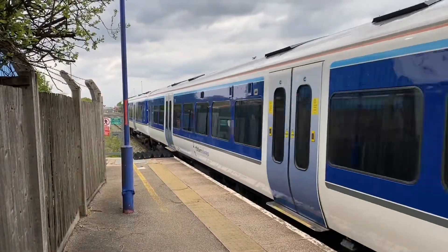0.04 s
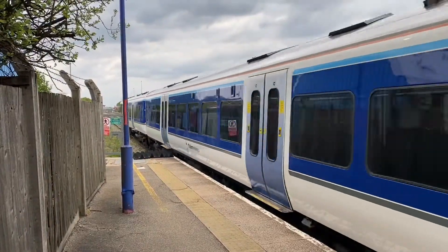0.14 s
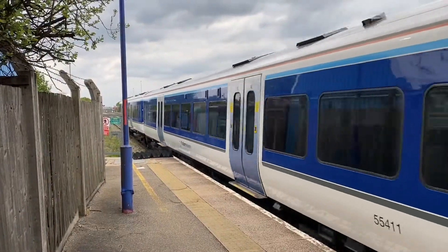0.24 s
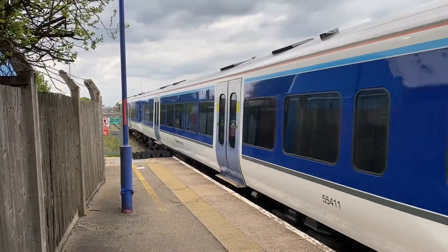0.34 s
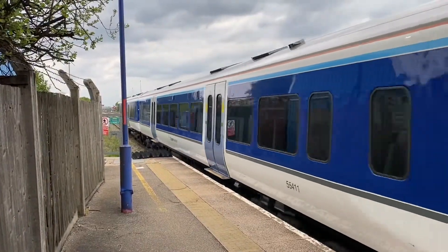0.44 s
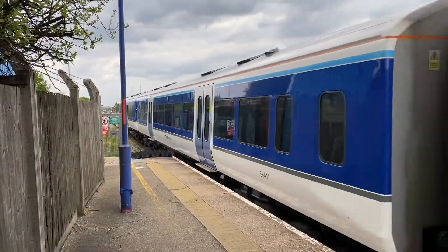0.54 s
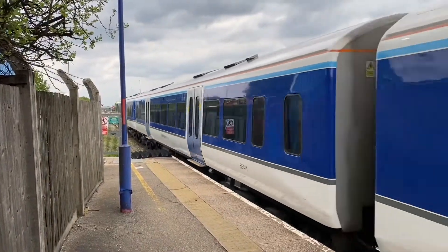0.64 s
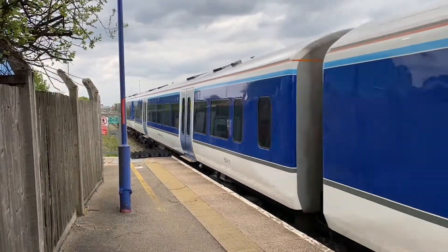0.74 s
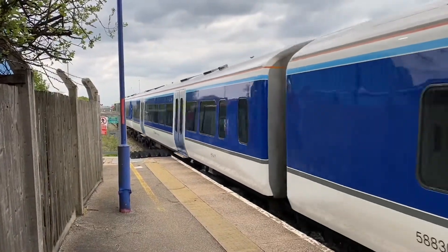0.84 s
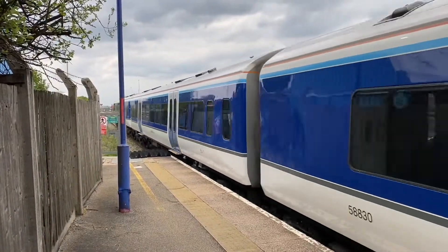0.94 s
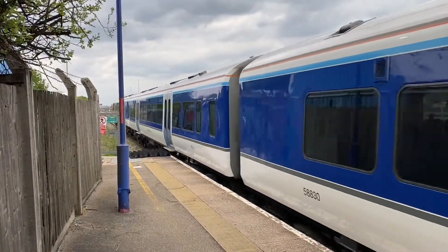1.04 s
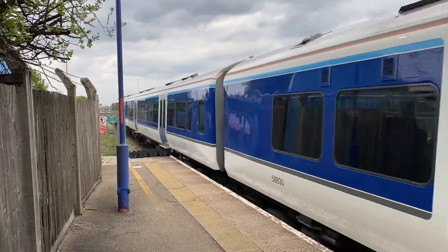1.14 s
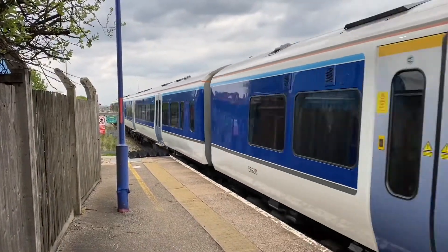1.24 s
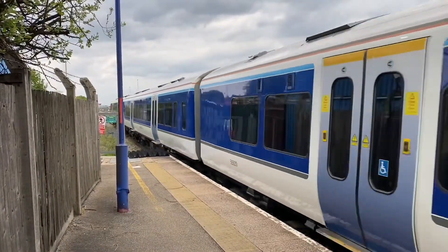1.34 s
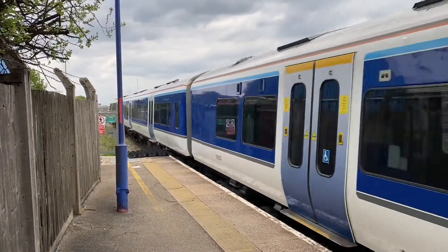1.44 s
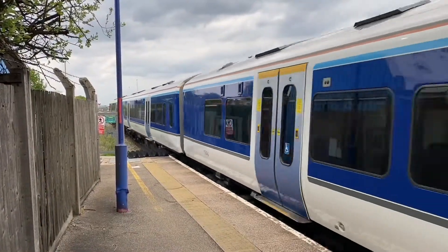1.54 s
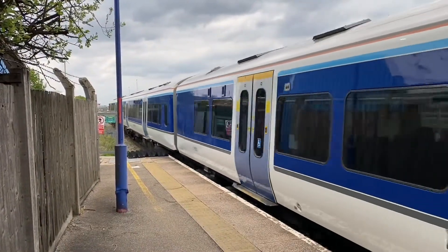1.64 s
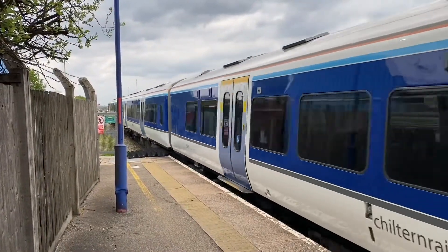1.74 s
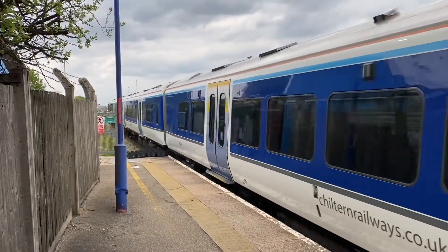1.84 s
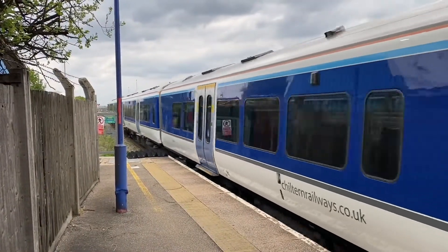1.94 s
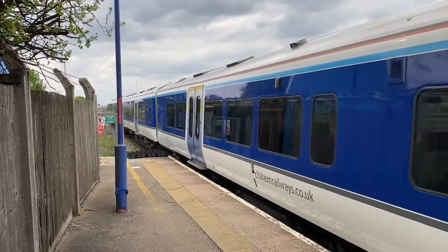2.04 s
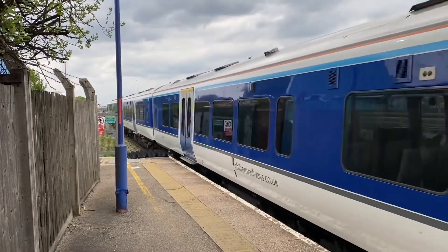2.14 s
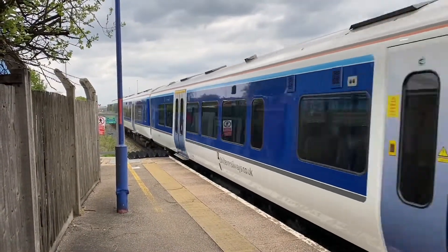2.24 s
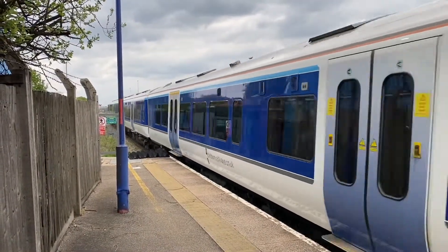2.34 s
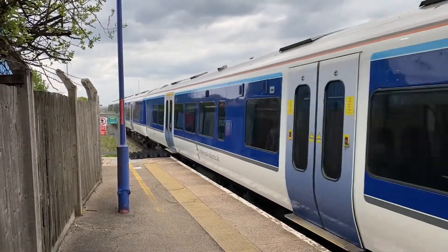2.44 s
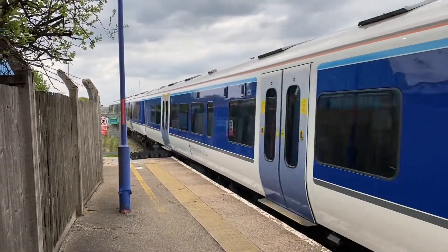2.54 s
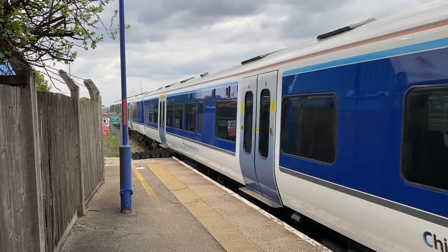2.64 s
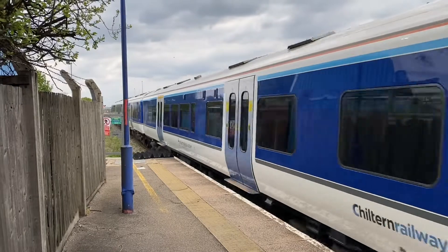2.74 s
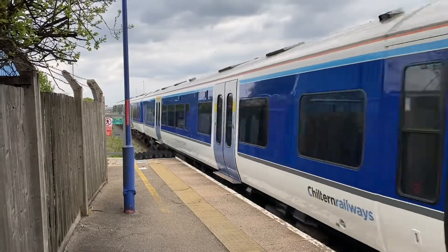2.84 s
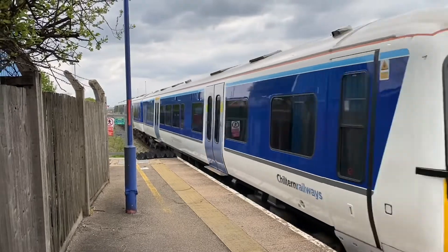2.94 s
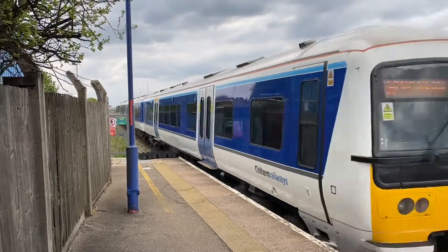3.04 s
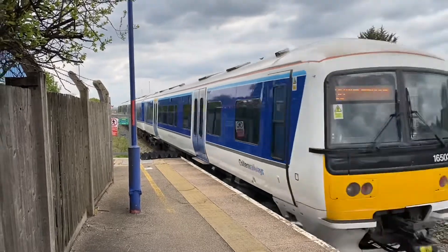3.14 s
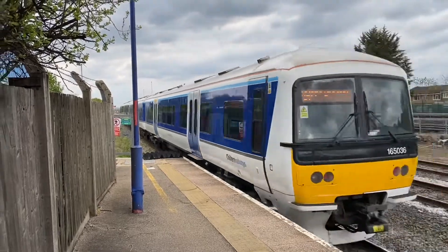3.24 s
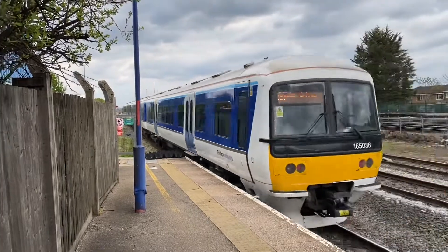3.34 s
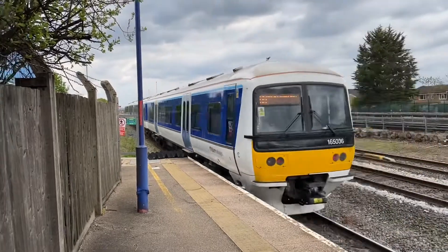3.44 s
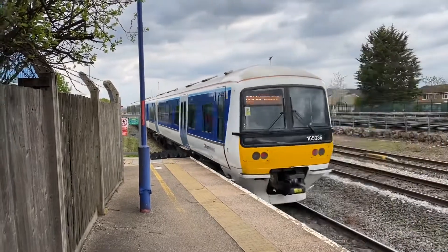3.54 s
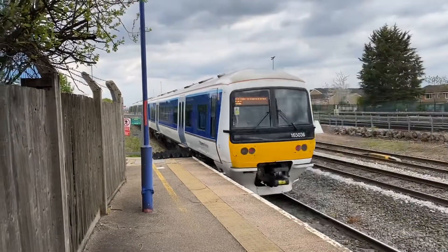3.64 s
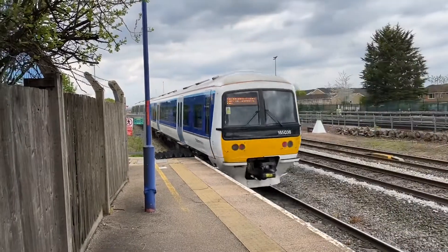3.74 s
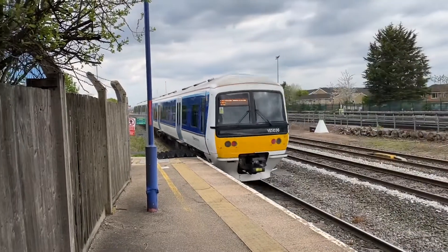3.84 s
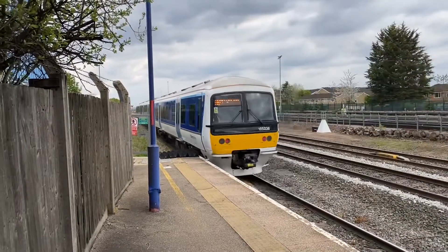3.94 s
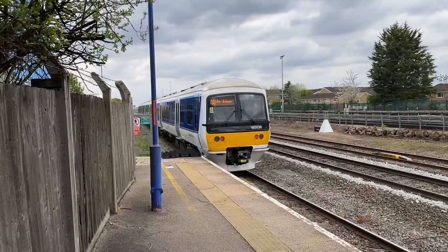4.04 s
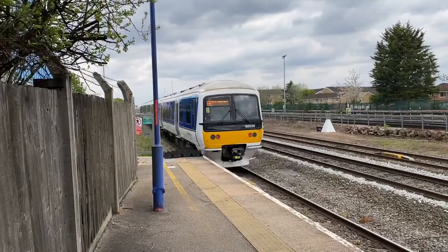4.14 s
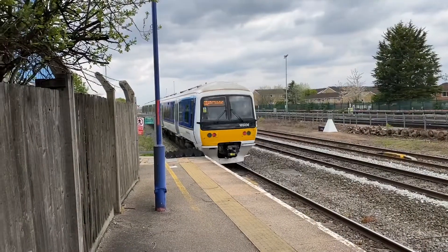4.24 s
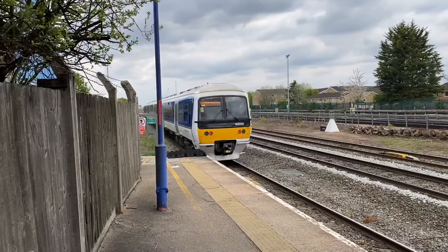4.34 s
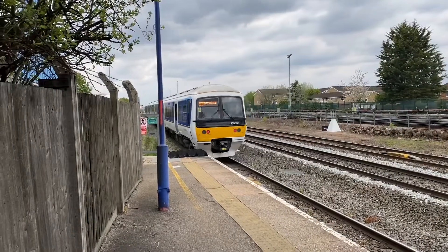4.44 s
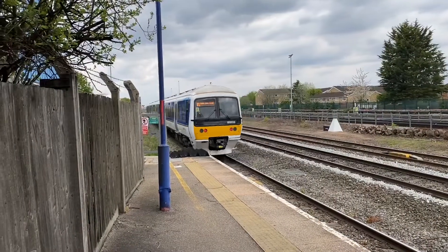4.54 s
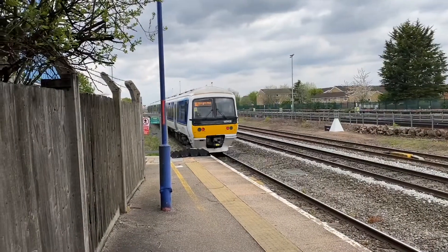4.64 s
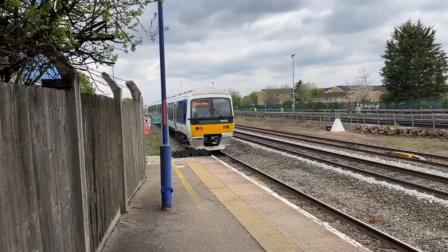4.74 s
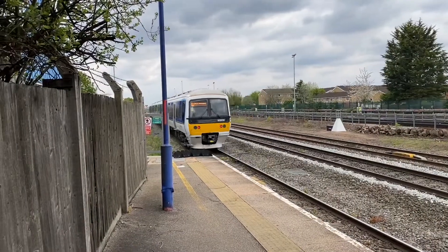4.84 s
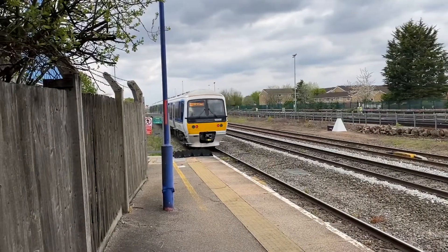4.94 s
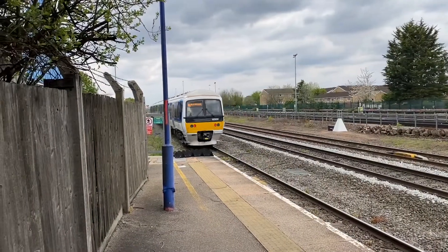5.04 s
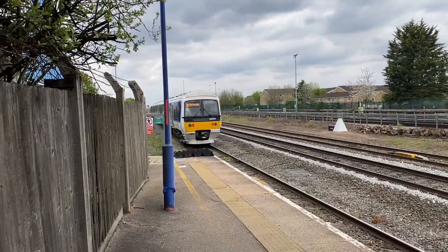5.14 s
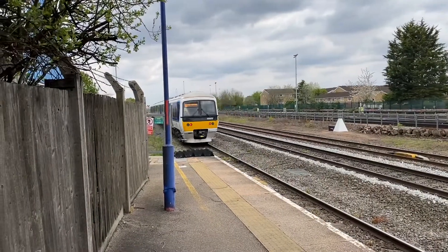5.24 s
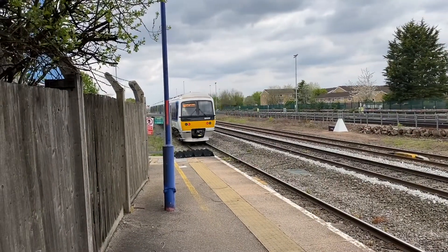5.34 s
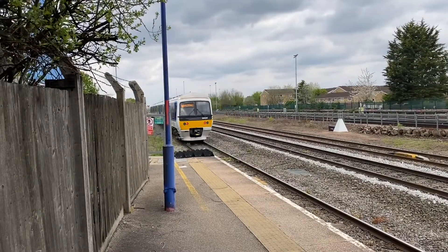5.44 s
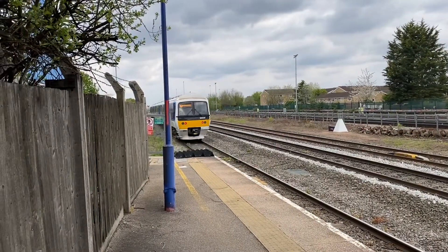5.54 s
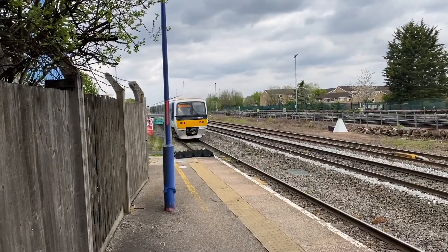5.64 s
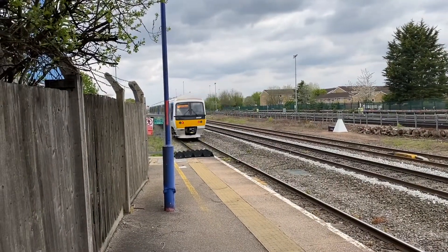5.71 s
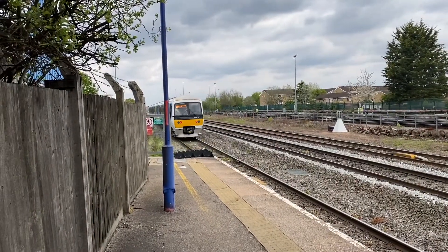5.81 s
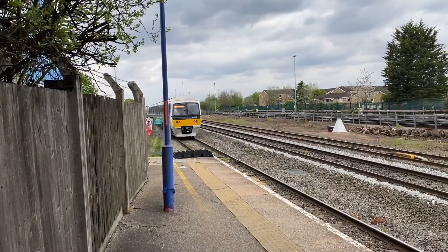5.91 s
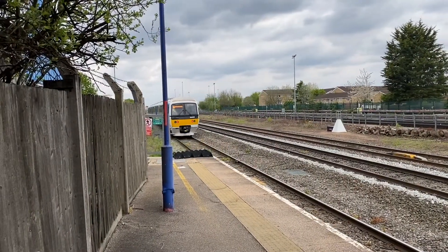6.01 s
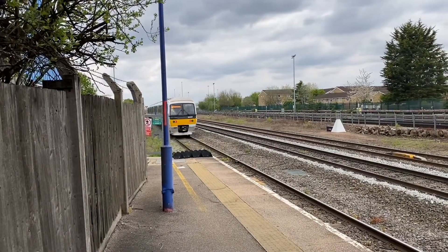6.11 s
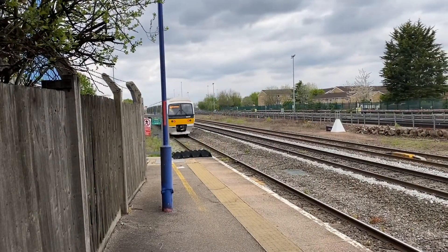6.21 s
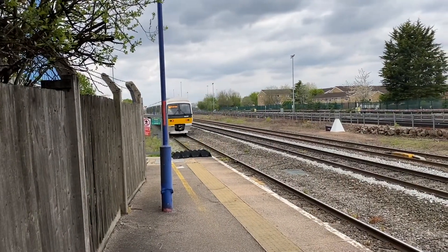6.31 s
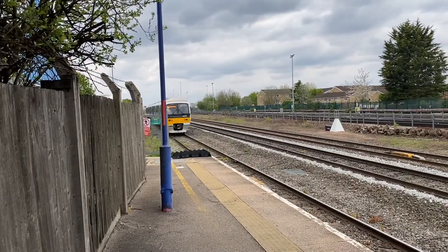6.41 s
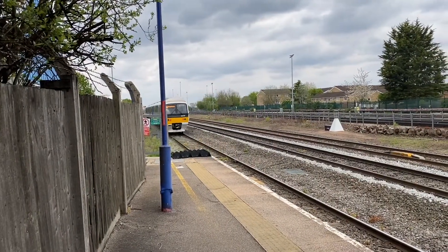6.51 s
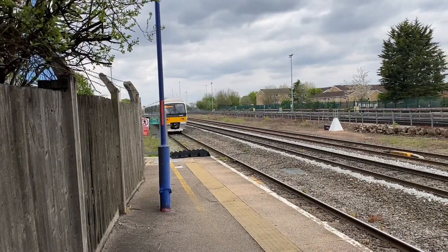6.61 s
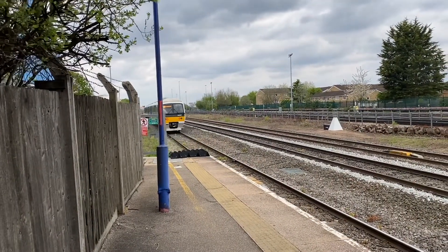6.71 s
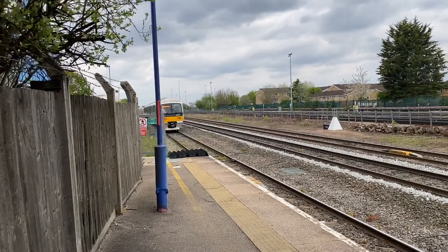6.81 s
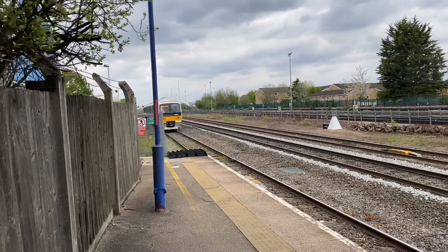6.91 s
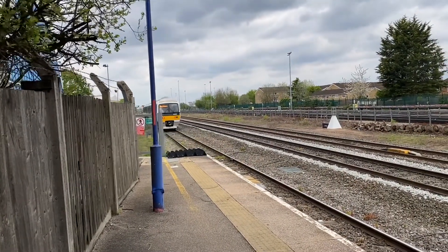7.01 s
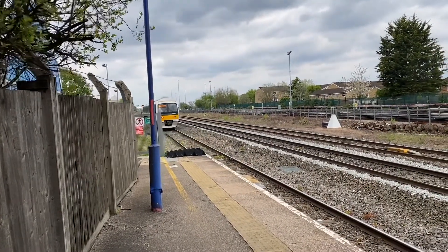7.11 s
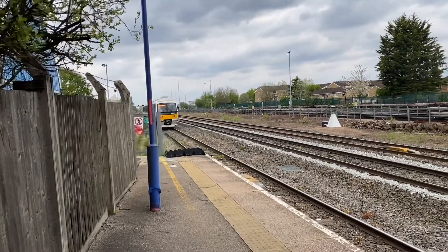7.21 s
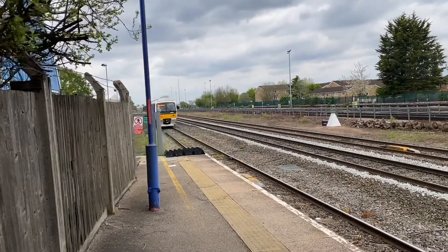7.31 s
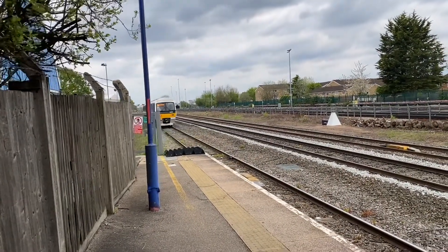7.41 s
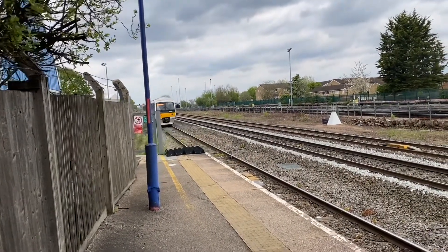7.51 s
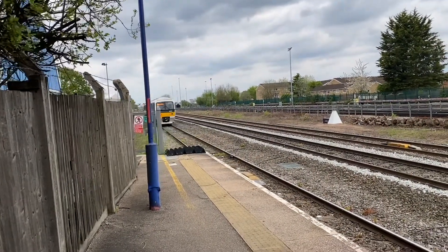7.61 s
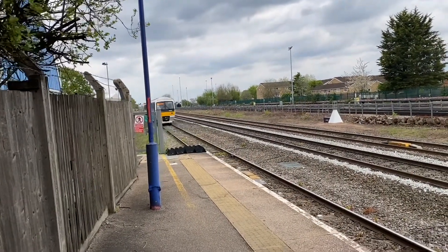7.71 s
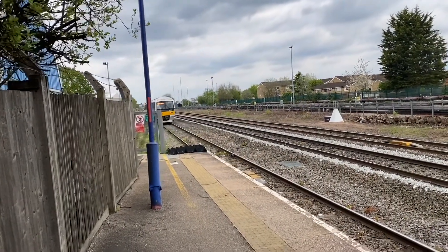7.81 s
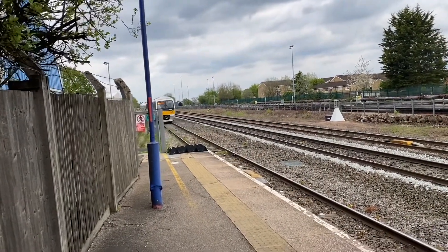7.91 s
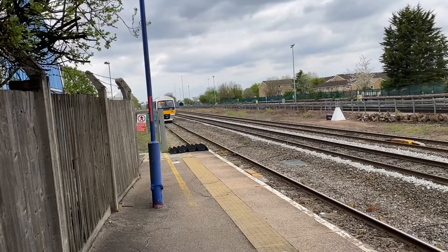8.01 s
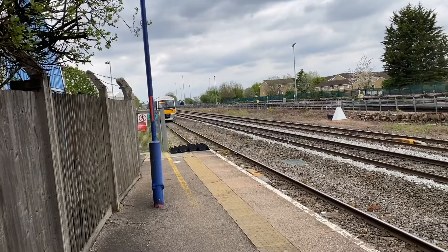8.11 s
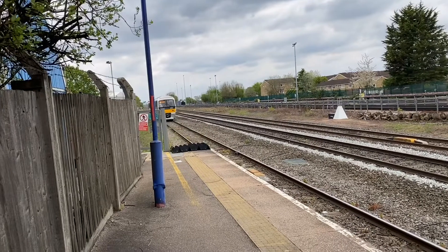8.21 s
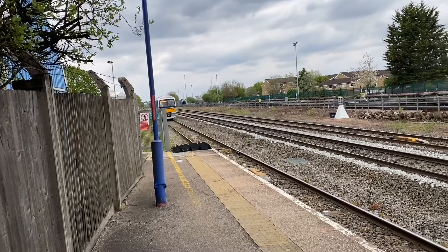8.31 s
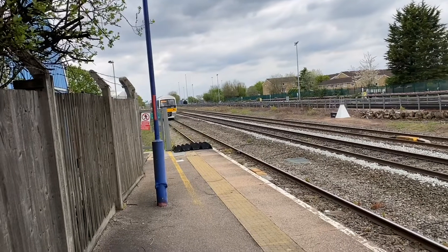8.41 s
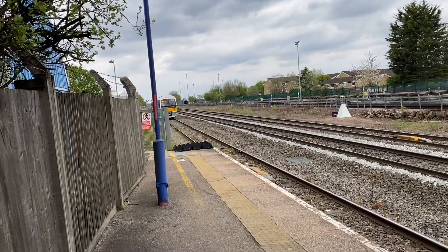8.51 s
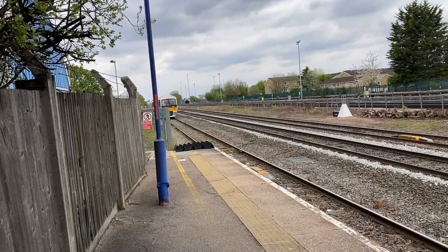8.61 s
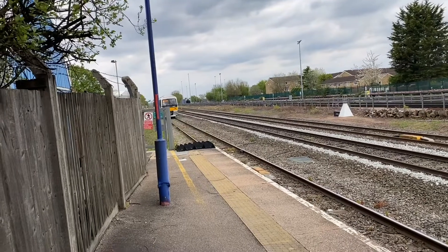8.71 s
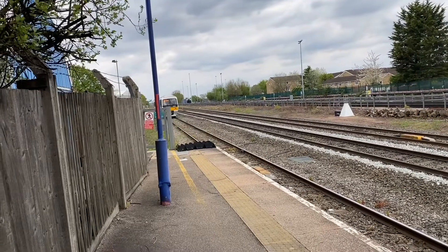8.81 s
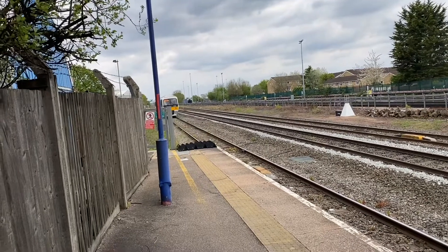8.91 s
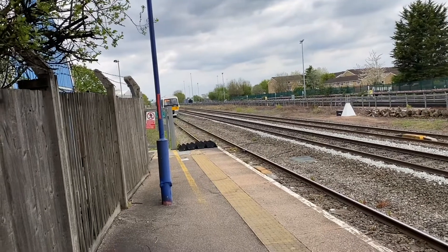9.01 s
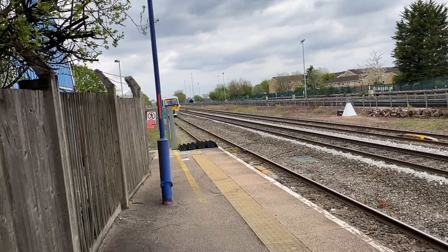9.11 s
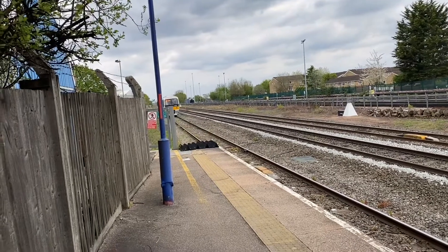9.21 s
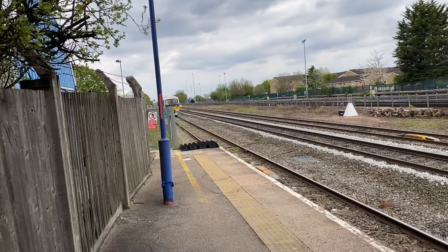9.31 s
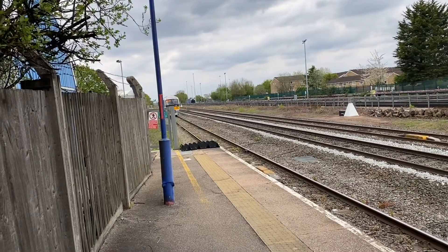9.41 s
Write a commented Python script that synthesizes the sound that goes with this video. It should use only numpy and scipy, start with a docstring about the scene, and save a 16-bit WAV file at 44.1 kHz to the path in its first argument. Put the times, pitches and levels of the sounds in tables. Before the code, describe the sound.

A diesel passenger train pulls away past an open platform, heard in wide stereo from about five metres. From 0 s the cars are alongside: low engine drone with slow beating, rough midrange wheel roar, drumming floor panels and heavy metallic clunks at about 0, 0.6 and 0.8 s. Between 1.2 and 2 s a bright airy hiss and engine clatter swell past with a thin, high turbo-like whistle. The last wheels pass around 2.2 s, with strong thuds at 2.25 and 2.5 s, slapped back by a fence. From 3 s the train recedes steadily; the treble goes first, the hum lingers, and smaller clacks recur irregularly from 3.7 s, with a brief rough one at 6.2 s. About 6.4 s the engines quickly drop to idle. Until 9.4 s only soft rolling rumble, faint wheel ringing and distant ticks remain, with tiny squeaks near 7.9 and 9.3 s.

```python
"""Diesel train leaving a platform

Heard from past the platform end, rails some 5 m off: a diesel multiple unit pulls out into the distance.
Two underfloor six-cylinder engines, sums of tones on the firing rate, drone and beat, then drop in level at idle.
Filtered noise makes the roar of wheels and rails, and a hiss that sweeps by with a thin whistle.
Axle after axle clunks over joints, as decaying modes and noise bursts; a fence throws the blows back."""
import sys
import numpy as np
from scipy import signal
from scipy.fft import rfft, irfft, next_fast_len
from scipy.io import wavfile
from scipy.ndimage import map_coordinates

SR = 44100
rng = np.random.default_rng(int(sys.argv[2]) if len(sys.argv) > 2 else 0)


def put_to_file(sound):
    """Save the sound as 16-bit audio at rate SR, in the file named by the first command-line argument."""
    columns = np.atleast_2d(sound).T  # one column per channel
    safe = np.clip(columns, -1, 1)
    whole_steps = np.round(safe * 32767)
    wavfile.write(sys.argv[1], SR, whole_steps.astype(np.int16))


N = 417186
TIME = np.arange(N) / SR

# The train gathers speed until the engines drop to idle, then coasts.
START_M_S, ACCEL_M_S2, POWER_OFF_S, WIND_DOWN_S = 9.3, 0.41, 6.41, 0.21
# When the last wheels pass the microphone, and its distance from the rails.
TAIL_PASSES_S, TRACK_M = 2.164, 5.44
# Width of the sound, cars alongside and far down the line: pitch_hz, side_over_mid_db
NEAR_WIDTH = [(60, -18), (130, -11), (260, -9.5), (400, -3.5), (650, -1.5), (1700, 2.5), (2400, -3.5),
              (3100, -3), (4200, -5.5), (8000, 1.5), (15000, -5)]
FAR_WIDTH = [(60, -22), (170, -21), (380, -8.5), (600, -6), (950, -7.5), (1350, 2.5), (2300, -7), (3100, 3),
             (4000, -5.5), (5200, -0.5), (15000, 10.5)]

# Faint far-off squeaks: start_s, length_s, start_hz, end_hz, level_db
SQUEAKS = [(7.853, .05, 2900, 2860, -54), (9.318, .02, 2980, 2940, -51), (9.333, .03, 2860, 2830, -51)]
# Spectrum of the body rumble: pitch_hz, level_db
RUMBLE_COLOUR = [(18, -50), (30, -13), (45, 0), (58, -1.5), (85, -2.5), (125, -2.5), (190, -10), (300, -35),
                 (1500, -90)]
# Running noise: level with the cars alongside, loss per doubling of the distance.
RUMBLE_DB, RUMBLE_FALL_DB = -31.5, 1.7
ROAR_DB, ROAR_FALL_DB = -24.5, 4.7
RAIL_DB, RAIL_FALL_DB = -34, 4
SING_DB, SING_FALL_DB, SING_WANDER = -40, 3.7, .005  # the last is the share by which its pitch wanders
# Drumming floor panels: pitch, width of each of two filter passes, level alongside, loss per doubling.
PANEL_HZ, PANEL_WIDTH_HZ, PANEL_DB, PANEL_FALL_DB = 275, 24, -30.5, 8
# Wheels singing: pitch_hz, width_hz, level_db
SINGING_MODES = [(908, 7, -3), (1105, 16, -9), (1690, 40, -13)]
# Spectra of the wheel roar, alongside and far off: pitch_hz, level_db
ROAR_NEAR_COLOUR = [(90, -19), (170, -2.5), (240, -1), (280, -3), (332, -5.5), (385, -2.5), (470, -4.5),
                    (540, -8), (620, -10), (930, -12.5), (1300, -17.5), (2200, -52.5)]
ROAR_FAR_COLOUR = [(90, -25), (170, 3.5), (250, -1.5), (350, -3.5), (550, -6.5), (720, -8), (980, -7.5),
                   (1250, -14.5), (2200, -73)]
# Brief swells of the roar, a passing engine exhaust, then rough rail: centre_s, half_length_s, swell_db
ROAR_SWELLS = [(0.362, 0.051, 3), (2.842, 0.074, 4.5), (6.183, 0.035, 9)]
# Spectra of the ringing rails, alongside and far off: pitch_hz, level_db
RAIL_NEAR_COLOUR = [(600, -3), (1100, 0.5), (1400, -0.5), (1700, 2), (2400, -5.5), (3000, -12.5),
                    (3700, -13.5), (5000, -18.5), (6000, -21), (8000, -26.5), (15000, -92)]
RAIL_FAR_COLOUR = [(700, -13), (1350, -2), (1750, 1.5), (2350, -2), (3000, -11.5), (4000, -13),
                   (5100, -21.5), (6000, -17.5), (8500, -32.5), (15000, -81)]
# Clatter of the rear engine bay: when it passes, level and distance then, loss per doubling, change at idle.
BAY_PASSES_S = 1.65
CLATTER_DB, CLATTER_M, CLATTER_FALL_DB, CLATTER_IDLE_DB = -27.5, 4.45, 7.5, -14
# Spectrum of the hiss: pitch_hz, level_db
HISS_COLOUR = [(2500, -21), (4500, 2.5), (5300, -0.5), (7000, -3.5), (9500, 3.5), (10100, 8), (10800, 2),
               (12100, -5.5), (14300, 3), (15500, -0.5)]
# Treble level of the hiss, peaking as the rear engine passes: time_s, level_db
HISS_TREBLE = [(0.0, -53.5), (0.76, -55), (1.16, -45), (1.47, -39), (1.71, -39), (2.18, -46.5), (2.97, -57),
               (4.45, -60.5), (5.06, -70), (6.22, -70.5), (6.72, -81), (7.45, -90), (9.46, -94)]
HISS_OVER_TREBLE_DB = 4  # the whole hiss over its treble
PORT_LAG_S = .00029  # later arrival at the left microphone port

# A slower machine under the floor, perhaps a compressor: multiple_of_stroke_rate, level_db
PUMP_TONES = [(1, 3.5), (2, 3.5), (3.5, -2), (4.5, -15)]
# Exhaust notes of the two engines: multiple_of_firing_rate, level_db
FRONT_TONES = [(1, -4), (1.5, -12), (2, -10.5), (2.5, -8), (3, -18), (3.5, -11), (4, -20), (5.5, -18)]
REAR_TONES = [(5 / 6, -6), (0.99, 0), (1.3, -13), (2, -2), (2.5, -19), (3.5, -11.5)]

# Wheels striking joints, mostly two to a bogie:
# start_s, rise_s, thud_hz, thud_db, clang_hz, clang_db, crack_db
WHEEL_BLOWS = [(0.034, 0.0028, 285, -7, 659, -18.5, -29), (0.556, 0.0014, 356, -9, 667, -17.5, -28),
               (0.836, 0.0022, 412, -9.5, 694, -19, -28.5), (1.765, .003, 373, -19.5, 715, -26, -50),
               (2.035, 0.0023, 390, -16.5, 704, -37, -39), (2.25, 0.0026, 325, -10, 634, -23, -31),
               (2.518, 0.0015, 313, -11.5, 605, -15.5, -27), (2.549, 0.0043, 316, -17, 580, -30, -38),
               (3.692, .004, 305, -27, 683, -39, -48), (3.952, .004, 360, -26.5, 675, -36, -53),
               (4.141, 0.0063, 345, -19, 777, -32, -41), (4.379, 0.00088, 485, -27, 694, -34, -39),
               (4.398, 0.0019, 380, -22, 847, -22, -32.5), (4.424, 0.0018, 394, -30, 647, -41, -55),
               (4.68, 0.0046, 242, -28.5, 806, -35, -46), (5.087, 0.0055, 298, -43, 942, -38, -45),
               (5.55, .0015, 290, -31.5, 840, -35.5, -44), (5.797, 0.0043, 268, -30, 852, -36, -41.5),
               (5.969, 0.0022, 430, -27.5, 696, -27, -38.5), (6.004, 0.005, 377, -32, 690, -46, -52),
               (6.218, 0.0014, 374, -23, 808, -21, -31.5), (6.492, .003, 397, -38.5, 730, -38.5, -41.5),
               (6.895, 0.0044, 367, -38.5, 760, -42, -53), (7.062, .006, 244, -33.5, 810, -47, -44),
               (7.342, 0.0053, 320, -36.5, 815, -40, -40.5), (7.591, .004, 396, -34.5, 790, -40, -42),
               (7.747, 0.0037, 430, -29, 804, -32, -34), (7.989, 0.0023, 378, -27.5, 930, -31.5, -31.5),
               (8.358, .006, 480, -43, 870, -44, -48), (8.607, 0.003, 456, -36.5, 810, -48, -62),
               (8.836, .004, 496, -40.5, 740, -40, -51), (9.087, 0.0067, 99, -33, 690, -39.5, -43),
               (9.245, 0.0066, 398, -42, 855, -37.5, -36), (9.272, 0.0047, 405, -41, 770, -42, -59)]
# Struck bogie: pitch_hz, level_db, t60_s
BOGIE_RING = [(213.5, 7, 0.14), (273, 3, 0.24), (336, -4, 0.091), (377.3, 1, 0.22), (419, 2, 0.14),
              (473.3, 6.5, 0.13), (656, -0.5, 0.17), (873, 14, 0.058)]
# Struck rail end: multiple_of_clang_pitch, level_db, t60_s
RAIL_RING = [(.8, 5, 0.04), (.92, 8.5, 0.047), (1.001, 5.5, 0.058), (1.1, 1, 0.049), (1.221, -8.5, 0.19)]
# Struck wheel rim: pitch_hz, level_db, t60_s
RIM_RING = [(1654, 3.5, 0.07), (1804, 3.5, 0.098), (2303, -3, 0.071), (3814, -3.5, .05), (5900, -11, .04)]
# Noise spectra of a struck rail end, its clang and its crack: pitch_hz, level_db
CLANG_COLOUR = [(150, -50), (350, -4), (540, 5.5), (770, -1), (960, -3.5), (1200, -21), (2000, -52),
                (6000, -82)]
CRACK_COLOUR = [(200, -40), (1250, 15), (1800, 17.5), (2400, 15.5), (3100, 5), (4300, 2), (6000, 0),
                (10000, -14), (15000, -39)]
# How the tones of thud, clang and crack reach the microphone, one row each; negative: the right leads or is louder
# left_lead_near_rad, left_over_right_near_db, left_lead_far_rad, left_over_right_far_db
PORT_ARRIVALS = [(1, -2, 0.27, -1.5), (-1.6, -3.5, 0.48, 2), (-2.7, 8, 0.59, 7)]
# Time for which the wheel bounces on the rail, and decay time of the main crack of the steel.
BOUNCE_S, CRACK_S = 0.014, 0.017
# The slower the wheel drops into a joint, the duller its crack: loss at 8 kHz per second of rise.
SOFT_JOINT_DB_PER_S = 1100
FAR_LINGER = .5  # share by which the shaking after a blow lasts longer far down the line
TOP_HZ = 15500  # upper limit of the recorder


def undb(db):
    """Decibels to gain."""
    return 10 ** (np.asarray(db) / 20)


def unit(x):
    """Scale to rms 1."""
    return x / np.sqrt(np.mean(x ** 2))


def colour(x, points):
    """Filter by a curve of (Hz, dB) points."""
    hz, db = np.transpose(points)
    size = next_fast_len(x.shape[-1], True)
    f = np.maximum(np.fft.rfftfreq(size, 1 / SR), 1)
    gain = undb(np.interp(np.log(f), np.log(hz), db))
    return irfft(rfft(x, size) * gain, size)[..., :x.shape[-1]]


def resonance(x, hz, width_hz):
    """Two-pole band-pass, gain 1 at the centre."""
    return signal.lfilter(*signal.iirpeak(hz, hz / width_hz, fs=SR), x)


def walk(rate):
    """Smooth random wander of spread about 1 that changes about rate times a second."""
    steps, coarse = rng.standard_normal(4096), TIME[::32]
    return np.interp(TIME, coarse, map_coordinates(steps, [coarse * rate], order=2, mode="wrap"))


def air(width):
    """Stereo noise, flat in total power, its side and mid shares set by a width table."""
    mid, side = rng.standard_normal((2, N))
    share = [(hz, 10 * np.log10(1 / (1 + undb(db) ** 2)), db) for hz, db in width]
    mid = colour(mid, [(hz, norm) for hz, norm, db in share])
    side = colour(side, [(hz, norm + db) for hz, norm, db in share])
    return np.array([mid + side, mid - side])


def ports(x, radians, left_db=0):
    """Share a sound between two microphone ports, the left ahead in phase and louder by left_db."""
    half = np.array([[.5], [-.5]])
    return np.real(signal.hilbert(x) * np.exp(1j * radians * half)) * undb(left_db * half)


def receding(near_points, far_points):
    """Noise whose colour and width pass from those of a train alongside to those of one far down the line."""
    far = np.clip((TIME - 2.3) / 2.18, 0, 1)
    close = unit(colour(air(NEAR_WIDTH), near_points))
    distant = unit(colour(air(FAR_WIDTH), far_points))
    return np.sqrt(1 - far) * close + np.sqrt(far) * ports(distant, 0.12)


def speed(s):
    """Speed of the train in m/s: a steady gain under power, then constant."""
    return START_M_S + ACCEL_M_S2 * np.minimum(s, POWER_OFF_S)


def along(passes_s):
    """Metres travelled since a part of the train passed the microphone; negative before."""
    track = np.cumsum(speed(TIME)) / SR
    return track - np.interp(passes_s, TIME, track)


def doublings(metres, closest_m):
    """How many times the distance exceeds the closest one, in doublings."""
    return np.log2(np.hypot(1, metres / closest_m))


def tail_doublings():
    """Doublings of the distance to the last wheels, held at 0 until they pass."""
    return doublings(np.maximum(along(TAIL_PASSES_S), 0), TRACK_M)


def bent(hz, metres, closest_m, bend):
    """Pitch that is high by up to the share bend on the approach and as much lower going away."""
    return hz * (1 - bend * metres / np.hypot(metres, closest_m))


def idling():
    """0 under power, 1 at idle."""
    return np.clip((TIME - POWER_OFF_S) / WIND_DOWN_S, 0, 1)


def chirps():
    """Short broken squeaks far off, a wheel flange or a bird: gliding sines with a wavering pitch."""
    out, waver = np.zeros(N), 1 + 0.0086 * walk(150)
    for s, length, start_hz, end_hz, db in SQUEAKS:
        u = np.clip((TIME - s) / length, 0, 1)
        hz = (start_hz + (end_hz - start_hz) * np.sqrt(u)) * waver
        out += undb(db) * np.sin(np.pi * u) * np.sin(2 * np.pi * np.cumsum(hz) / SR)
    return out * undb(2.5 * walk(120))


def rattles():
    """Small irregular knocks of loose running gear: noise bursts through the last 60 % of the scene."""
    count = 90
    when, size = rng.random((count, 2)).T
    knocks = np.zeros(N)
    knocks[((1 - .6 * when) * (N - 1)).astype(int)] = undb(-10 * size)
    t = TIME[:SR // 5]
    envelope = signal.fftconvolve(knocks, (1 - np.exp(-t / 0.0029)) * np.exp(-t / 0.015))[:N]
    gear = [(60, -27), (400, -22), (900, 3.0), (1300, 3.5), (2200, 9.5), (3200, -19.0), (6000, -48), (12000, -57)]
    return unit(colour(air(FAR_WIDTH), gear)) * envelope * undb(-43.5)


def body_rumble(away):
    """The car bodies rumble: low noise of unsteady level that carries far."""
    level_db = RUMBLE_DB - RUMBLE_FALL_DB * away + walk(12) + walk(25)
    return unit(colour(air(FAR_WIDTH), RUMBLE_COLOUR)) * undb(level_db)


def panel_drumming(away):
    """The floor panels drum at one low pitch while the cars are near: noise through a doubled resonance."""
    once = resonance(air(NEAR_WIDTH), PANEL_HZ, PANEL_WIDTH_HZ)
    drumming = unit(resonance(once, PANEL_HZ, PANEL_WIDTH_HZ))
    return drumming * undb(PANEL_DB - PANEL_FALL_DB * away)


def wheel_singing(away):
    """Rubbing noise excites the wheels' own resonances, which waver in level and pitch."""
    rub = air(FAR_WIDTH)
    singing = unit(sum(undb(db + 2 * walk(2.84)) * resonance(rub, hz, width)
                       for hz, width, db in SINGING_MODES))
    wander = TIME + SING_WANDER * np.cumsum(walk(4)) / SR
    singing = np.array([np.interp(wander, TIME, v) for v in singing])
    return singing * undb(SING_DB - SING_FALL_DB * away)


def wheel_roar(away, jolts):
    """Rough wheel treads roar on the rails, with brief swells."""
    swell_db = sum(db * np.exp(-((TIME - s) / half) ** 2) for s, half, db in ROAR_SWELLS)
    level_db = ROAR_DB - ROAR_FALL_DB * away + swell_db + 1.6 * walk(25) + jolts
    return receding(ROAR_NEAR_COLOUR, ROAR_FAR_COLOUR) * undb(level_db)


def rail_ring(away, jolts, pulse):
    """The rails ring and the engine bay clatters: upper noise pulsing at the firing rate."""
    bay_away = doublings(along(BAY_PASSES_S), CLATTER_M)
    clatter = undb(CLATTER_DB - CLATTER_FALL_DB * bay_away + CLATTER_IDLE_DB * idling())
    steel = np.hypot(undb(RAIL_DB - RAIL_FALL_DB * away), clatter)
    return receding(RAIL_NEAR_COLOUR, RAIL_FAR_COLOUR) * pulse * steel * undb(1.16 * walk(45) + .5 * jolts)


def engine_hiss(pulse):
    """A treble hiss straight from the right, later at the left microphone port, plus scattered noise."""
    jet = rng.standard_normal(N)
    direct = np.array([np.roll(jet, round(PORT_LAG_S * SR)), jet])
    scattered = .35 * air(NEAR_WIDTH)
    level_db = np.interp(TIME, *np.transpose(HISS_TREBLE)) + HISS_OVER_TREBLE_DB
    return unit(colour(direct + scattered, HISS_COLOUR)) * pulse * undb(level_db + .5 * walk(20))


def running(firing):
    """Running gear together: shared jolts shake wheels and rails, the firing pulses rails and hiss."""
    away = tail_doublings()
    jolts = walk(17)  # uneven track
    pulse = 1 + 0.019 * np.cos(firing)
    wheels = wheel_roar(away, jolts) + wheel_singing(away)
    upper = rail_ring(away, jolts, pulse) + engine_hiss(pulse)
    return body_rumble(away) + panel_drumming(away) + wheels + upper


def whistle(passes_s, hz, bend, closest_m, near_db, fall_db, rearward_db, stops_s):
    """A thin, breathy tone, probably a turbocharger, that drops in pitch going by and beams backwards."""
    metres = along(passes_s)
    phase = 2 * np.pi * np.cumsum(bent(hz, metres, closest_m, bend) * (1 + 0.00264 * walk(25))) / SR
    tone = np.array([unit(walk(130) * np.cos(phase) + walk(130) * np.sin(phase)) for _ in range(2)])
    beam_db = rearward_db * metres / np.hypot(metres, TRACK_M)
    db = near_db - fall_db * doublings(metres, closest_m) + beam_db
    # it swells briefly, then drops back well below
    swell_db = np.interp(TIME - stops_s, [-.3, -.05, .1], [0, 4, -9])
    return tone * undb(db + swell_db + .5 * walk(12))


def whistles():
    """One whistle for each engine."""
    front = whistle(passes_s=.45, hz=3660, bend=.024, closest_m=4.5,
                    near_db=-54.5, fall_db=3, rearward_db=3, stops_s=1.2)
    rear = whistle(passes_s=1.22, hz=3378, bend=.014, closest_m=2.4,
                   near_db=-40, fall_db=5.4, rearward_db=3.8, stops_s=3.5)
    return front + rear


def engine(orders, passes_s, hz, bend, closest_m, near_db, carried_db, idle_db, waver_db, dulling_db):
    """Tones on the firing or stroke rate; uneven cylinder groups add half orders. Also gives its phase."""
    metres = along(passes_s)
    phase = 2 * np.pi * np.cumsum(bent(hz, metres, TRACK_M, bend) * (1 + 0.0015 * walk(8))) / SR
    out = 0
    for k, db in orders:
        # the overtones fade over the first 4 s as the car draws away
        gain = undb(db + waver_db * walk(5) - dulling_db * np.log2(k) * np.minimum(TIME, 4))
        lag = np.array([[.06], [-.06]]) * k
        out = out + gain * np.sin(k * phase + rng.uniform(0, 2 * np.pi) + lag)
    # a brief swell as it goes by, over a drone that carries far along the line
    level = np.hypot(undb(near_db) / 2 ** doublings(metres, closest_m), undb(carried_db))
    return np.sqrt(2) * out * level * undb(idle_db * idling()), phase


def engines():
    """Two engines and the slower machine under the floor; also gives the rear engine's firing phase."""
    pump, _ = engine(PUMP_TONES, passes_s=1.55, hz=59.83, bend=.012, closest_m=1.3, near_db=-32.5,
                     carried_db=-47.5, idle_db=-6.5, waver_db=1.5, dulling_db=0.8)
    front, _ = engine(FRONT_TONES, passes_s=0.369, hz=70.8, bend=.019, closest_m=2.6, near_db=-21.0,
                      carried_db=-35.0, idle_db=-19, waver_db=3.0, dulling_db=0.7)
    rear, firing = engine(REAR_TONES, passes_s=2.003, hz=75.63, bend=0.00537, closest_m=12.7, near_db=-31.5,
                          carried_db=-38.5, idle_db=-11.0, waver_db=1.0, dulling_db=0.73)
    return front + rear + pump, firing


def ringing(modes, t):
    """Decaying modes (Hz, dB, t60 s), scaled by their summed power, a little different on every blow."""
    chance = rng.standard_normal((len(modes), 2))
    ring = sum(undb(db - 60 * t / t60) * np.sin(2 * np.pi * hz * (1 + 0.019 * c[0]) * t + c[1])
               for (hz, db, t60), c in zip(modes, chance))
    return ring / np.sqrt(sum(undb(db) ** 2 for _, db, _ in modes))


def joints():
    """Each wheel strikes a rail end: the rim cracks, the rail clangs, the bogie thuds and loose gear shakes on."""
    out, size, lead = np.zeros((2, N + SR)), SR // 4, SR // 20
    blow = slice(lead, lead + int(.022 * SR))  # each part is levelled by its rms here
    t = (np.arange(size) - lead) / SR
    after, before = np.maximum(t, 0), np.minimum(t, 0)
    approach = np.exp(before / 0.031 - after / 0.0061)  # noise that grows just ahead of the blow
    body = [(50, -32), (90, 1.5), (180, -3.5), (400, 2.0), (560, -5), (1100, -50), (6000, -80)]
    shudder, scrape, grit = (np.pad(receding(c, c), ((0, 0), (lead, SR - lead)), "wrap")
                             for c in (body, CLANG_COLOUR, CRACK_COLOUR))
    for s, rise_s, hz, thud_db, clang_hz, clang_db, crack_db in WHEEL_BLOWS:
        span = slice(int(s * SR), int(s * SR) + size)
        far = np.clip((s - 2.6) / .8, 0, 1)
        soft = 1 - np.exp(-(after / (rise_s + 0.0018)) ** 2)
        hard = 1 - np.exp(-(after / rise_s) ** 2)
        late = after / (1 + FAR_LINGER * far)
        # the wheel bounces for a few cycles and stops short
        held = soft / (1 + (after / (BOUNCE_S + rise_s)) ** 6)
        jitter = .00022 * np.sin(2 * np.pi * (60 * t + rng.random()))
        bounce = held * np.sin(2 * np.pi * hz * (t + jitter))
        # the bogie rings on in the modes near the thud pitch
        near_modes = [(f, db - 10 * np.log2(f / hz) ** 2, t60) for f, db, t60 in BOGIE_RING]
        thud = bounce + 1.05 * soft * ringing(near_modes, late)
        clang = hard * ringing([(k * clang_hz, db, t60) for k, db, t60 in RAIL_RING], after)
        rim = hard * ringing(RIM_RING, after)
        crack = colour(grit[:, span], [(2400, 0), (8000, -SOFT_JOINT_DB_PER_S * rise_s)])
        crack_decay = .65 * np.exp(-after / CRACK_S) + .2 * np.exp(-late / .05)
        noises = [(.22 * soft * np.exp(-late / .045) + .12 * approach) * shudder[:, span],
                  (0.14 * hard * np.exp(-late / 0.033) + 0.057 * approach) * scrape[:, span],
                  (hard * crack_decay + .14 * approach) * crack]
        for tone, noise, db, (near_rad, near_db, far_rad, far_db) in zip(
                (thud, clang, rim), noises, (thud_db, clang_db, crack_db), PORT_ARRIVALS):
            lead_rad = near_rad + far * (far_rad - near_rad)
            left_db = near_db + far * (far_db - near_db)
            part = ports(tone, lead_rad, left_db) + noise
            out[:, span] += undb(db) * part / np.sqrt(np.mean(part[:, blow] ** 2))
    return out[:, lead:lead + N]


def fence(x):
    """Two short reflections, thin in the bass, one to each side: 12 ms left, 29 ms right."""
    thin = colour(x, [(200, -12), (1500, -8), (8000, 10)])
    return np.array([np.interp(TIME - lag, TIME, v, left=0) for lag, v in zip((.012, .029), thin)])


def scene():
    """Engines, running gear and rail joints, heard from the platform."""
    power, firing = engines()
    blows = joints()
    train = rattles() + running(firing) + whistles() + power + blows + undb(-20.0) * fence(blows)
    # while the cars are alongside, their low body sound leans to the right and the ring of the steel to the left
    right = colour(train, [(60, -46), (150, -18), (280, -19.0), (600, -90)])
    left = colour(train, [(400, -60), (1000, -19), (2000, -26), (4000, -18), (9000, -25)])
    lean = (right - left) * np.interp(TIME, [2.6, 3.4], [1, 0])
    balance = undb(np.array([[-.35], [.35]]))  # the right a little louder
    return train * balance + lean * np.array([[-1], [1]]) + chirps()


def record(dry):
    """The recorder rounds the loudest peaks and cuts the top."""
    rounded = dry / (1 + dry ** 4) ** (1 / 4)
    return signal.sosfilt(signal.ellip(8, .2, 70, TOP_HZ, fs=SR, output="sos"), rounded)


dry = scene()
out = record(dry)
put_to_file(out)
```